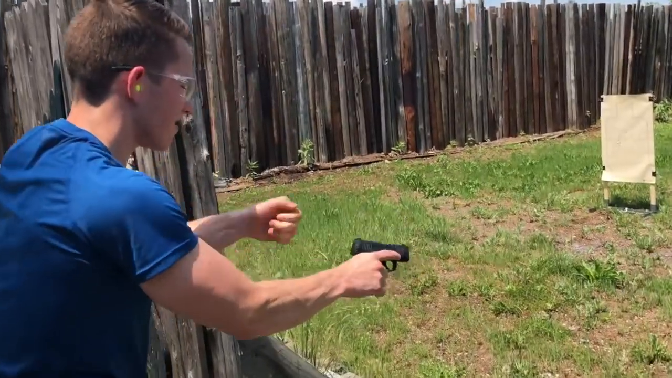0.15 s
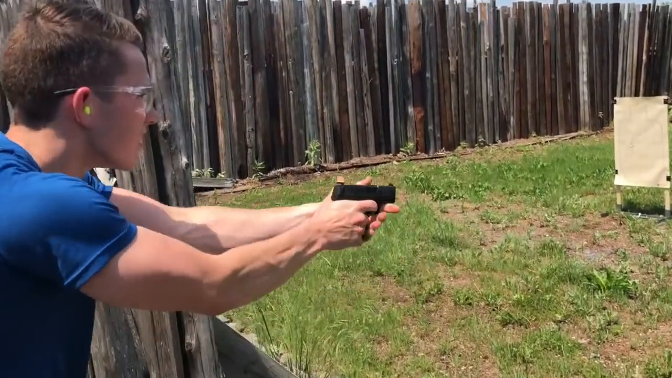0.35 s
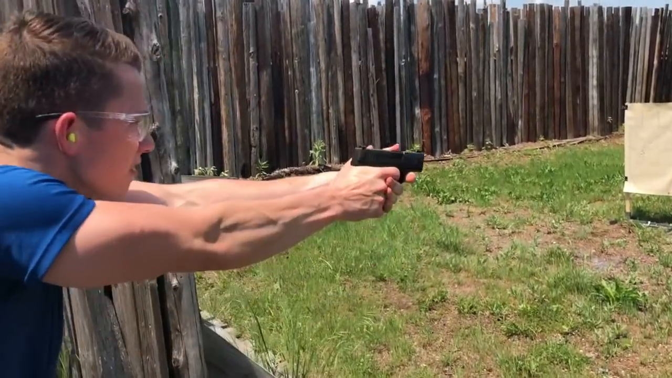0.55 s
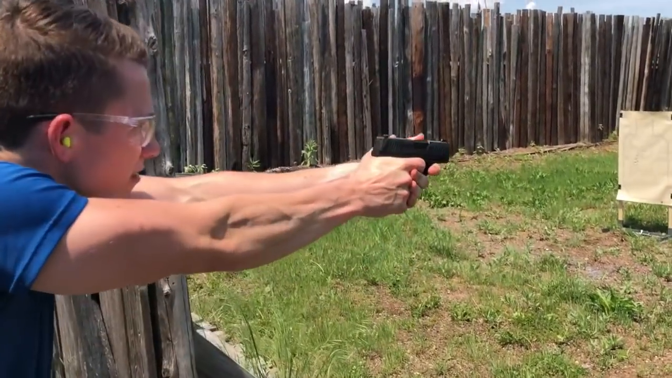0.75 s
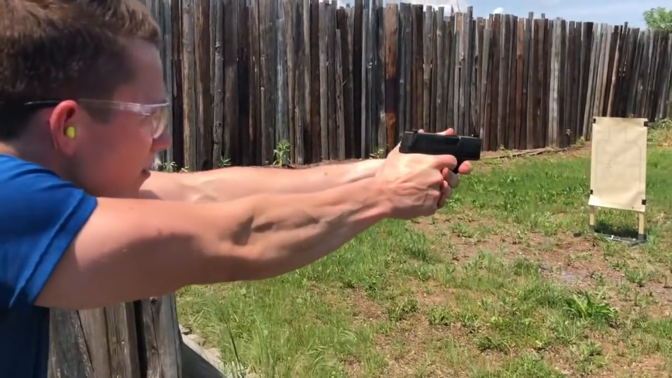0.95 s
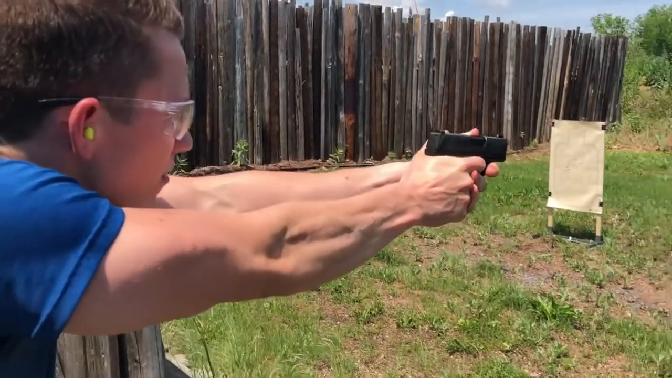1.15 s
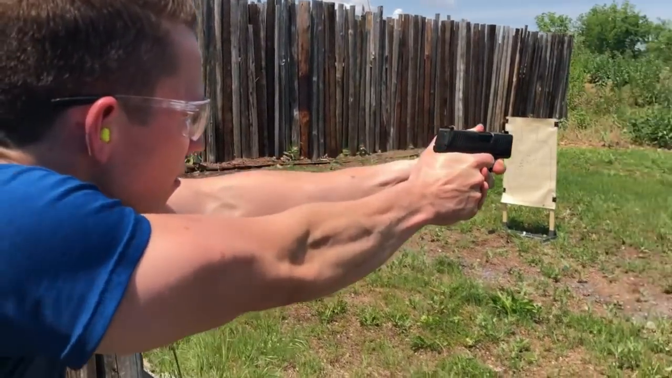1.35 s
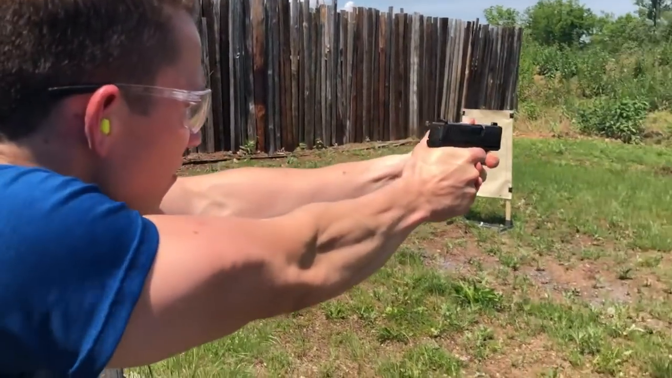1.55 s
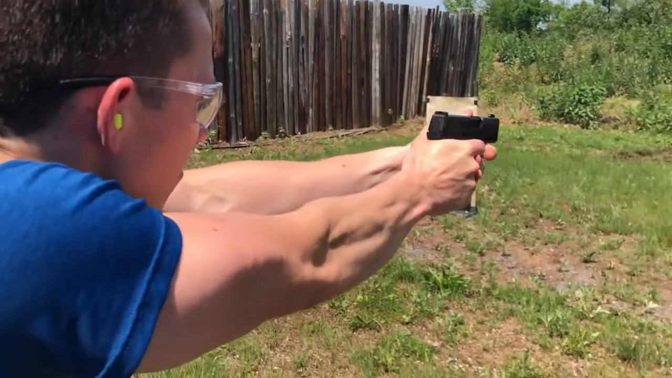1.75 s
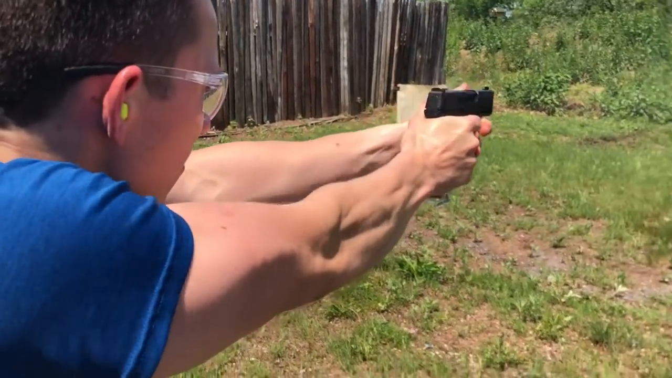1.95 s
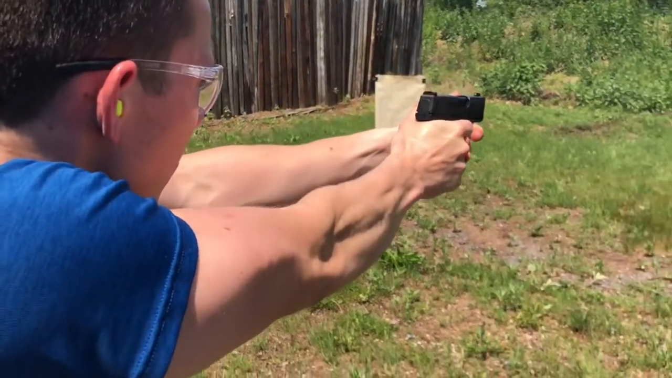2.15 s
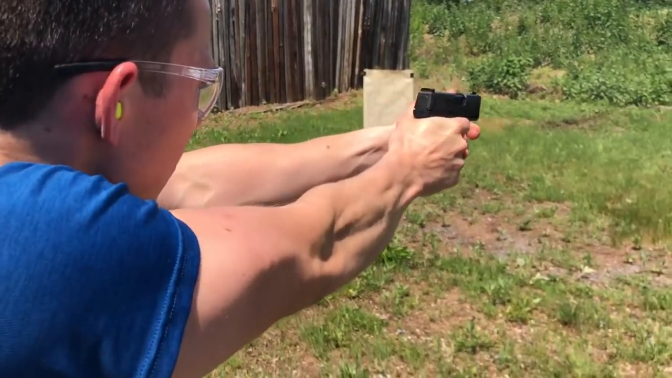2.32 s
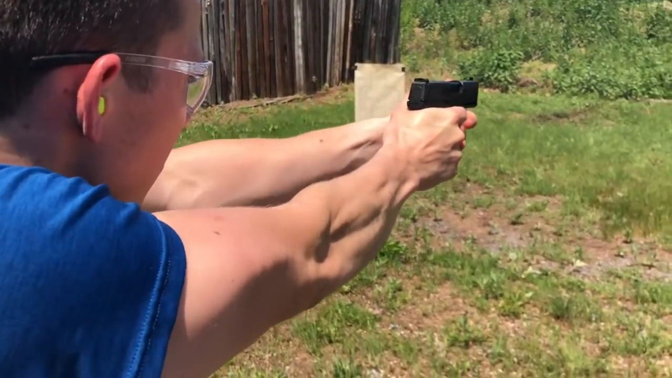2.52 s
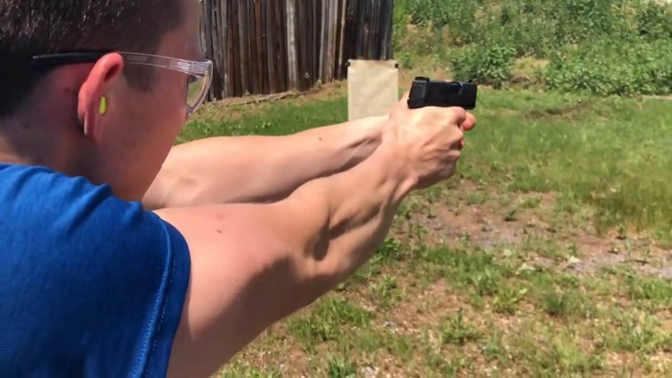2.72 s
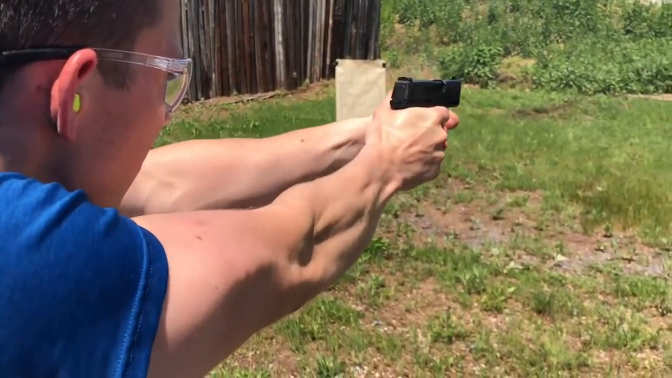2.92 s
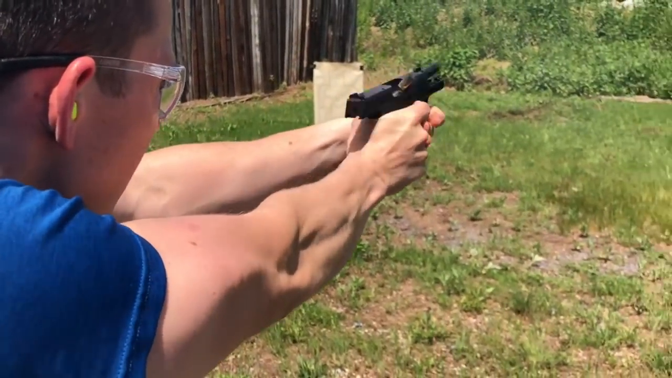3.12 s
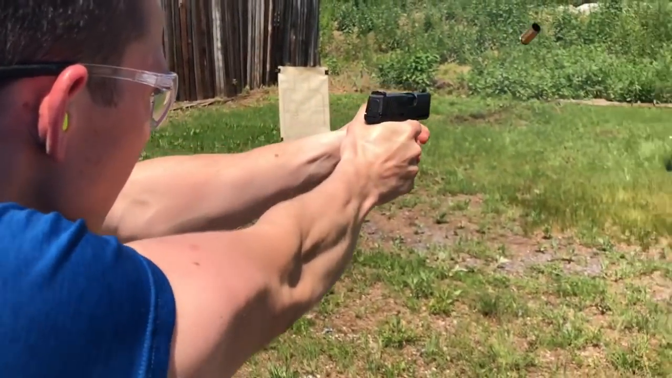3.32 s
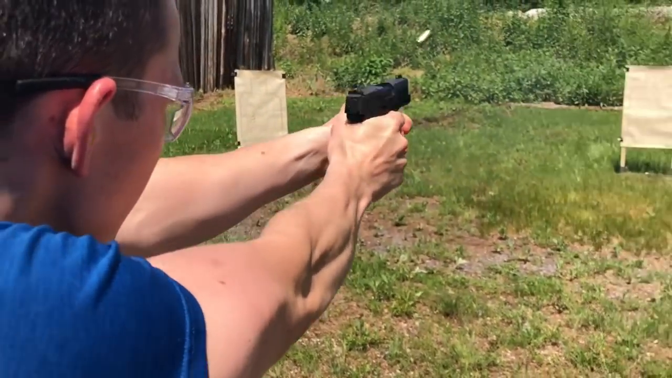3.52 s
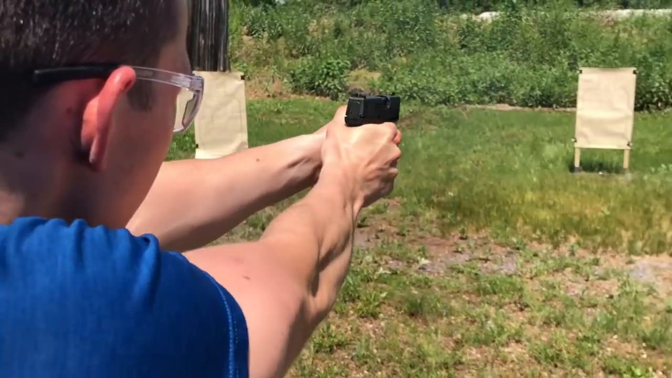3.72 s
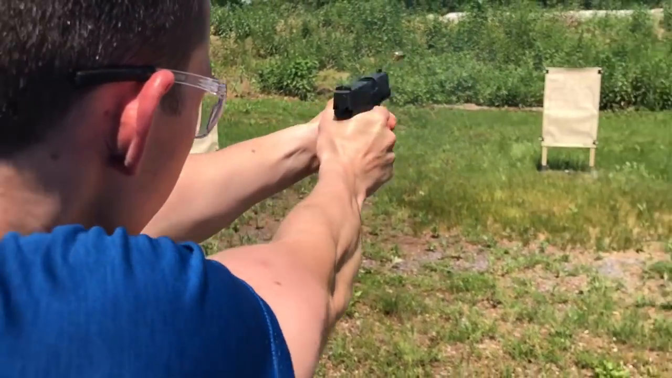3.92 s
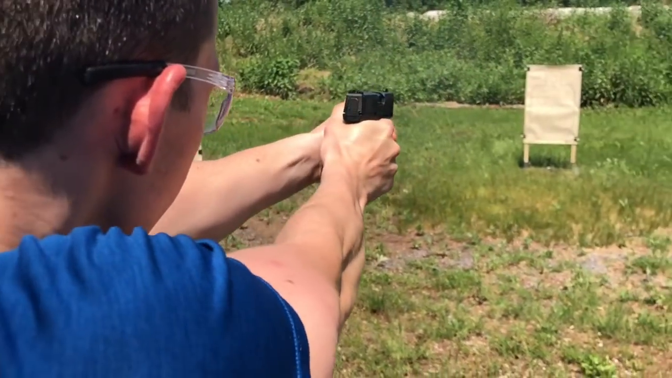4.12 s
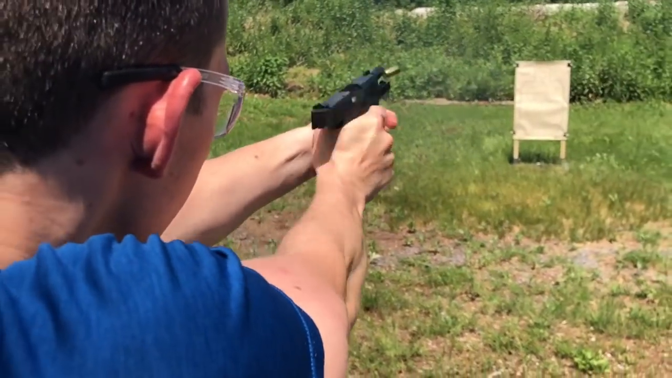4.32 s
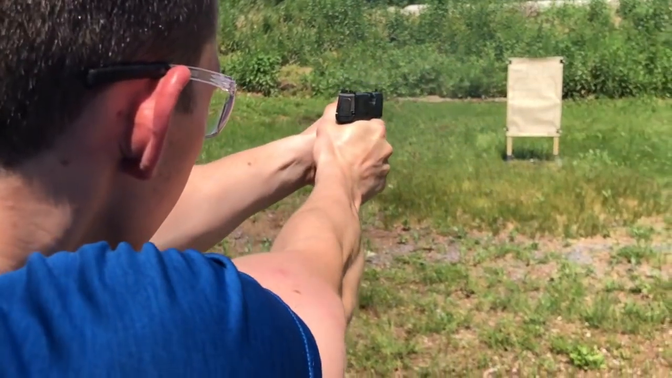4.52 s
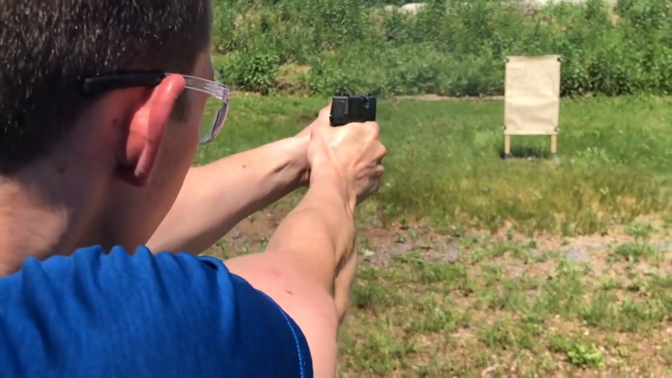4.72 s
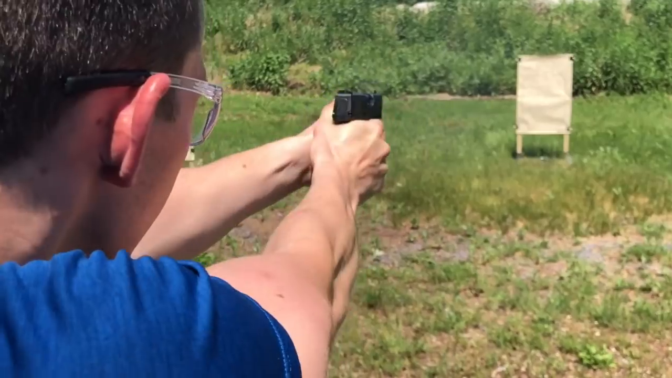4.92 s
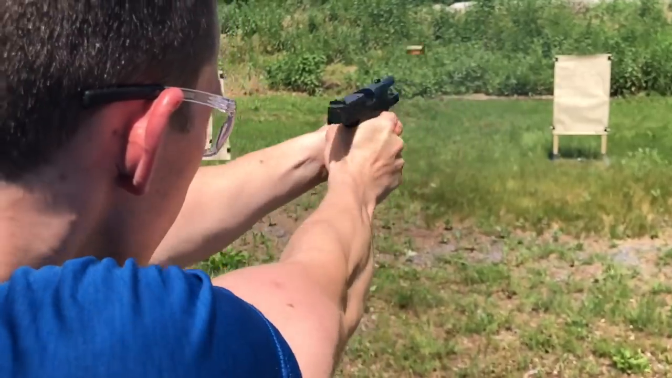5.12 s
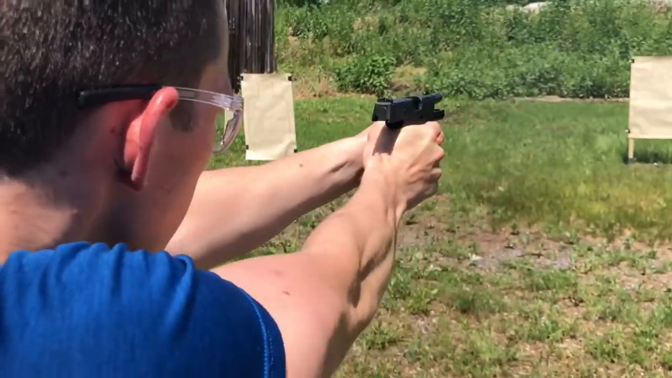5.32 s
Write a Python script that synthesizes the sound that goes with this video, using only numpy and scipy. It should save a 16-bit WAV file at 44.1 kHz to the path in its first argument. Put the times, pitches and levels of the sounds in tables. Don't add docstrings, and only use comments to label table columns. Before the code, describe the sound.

Metallic gun racking, a quiet pause with faint birds and handling, then a steady string of ten pistol shots echoing across an open range.

```python
import sys
import numpy as np
from scipy import signal
from scipy.fft import rfft, irfft
from scipy.io import wavfile
from scipy.ndimage import uniform_filter1d

SR = 44100
rng = np.random.default_rng(int(sys.argv[2]) if len(sys.argv) > 2 else 0)


def digitize_waveform(pressure):
    field = np.atleast_2d(pressure).T
    bounded = np.clip(field, -1, 1)
    quanta = np.round(bounded * 32767).astype(np.int16)
    wavfile.write(sys.argv[1], SR, quanta)


def level_to_linear(level):
    exponent = np.asarray(level, float) / 20
    return 10 ** exponent


N = 240472
ECHO_LENGTH = 32768

# [f/Hz, level/dB per Hz]
AIR_COLOUR = [(15, -36.5), (25, -14), (74, 2.5), (206, -14), (363, -12), (416, -24), (489, -12.5),
              (591, -17.5), (1790, -20), (2910, -27), (3720, -24), (14400, -48), (16000, -51.5)]
# [start t/s, end t/s, f/Hz, width f/Hz, level/dB]
INSECTS = [
    (0.55, 0.9, 1760, 70, -70),
    (0.4, .93, 2200, 200, -78),
    (0.23, 0.66, 1520, 120, -80),
    (0.62, 0.97, 3750, 260, -77),
    (0.54, 0.67, 4450, 200, -76),
    (0.58, .8, 5550, 150, -79),
    (.88, 1.02, 6100, 400, -78),
    (1.09, 1.24, 6500, 400, -78),
    (1.3, 1.43, 3400, 450, -73),
    (0.73, 1.43, 520, 21, -72.5),
]
# [start t/s, length t/s, from f/Hz, to f/Hz, peak level/dB]
BIRD_WHISTLES = [
    (0.972, .036, 3950, 3480, -64),
    (1.014, 0.095, 4500, 4900, -70),
    (1.093, 0.13, 2150, 2110, -66),
    (1.222, 0.12, 2750, 3050, -63.5),
    (1.22, .14, 4600, 5450, -74),
    (1.352, .042, 3900, 3500, -60.5),
    (1.385, 0.055, 4250, 4800, -67),
]
# [start t/s, attack t/s, length t/s, peak level/dB, end level/dB]
SLEEVE_RUBS = [
    (0.233, 0.013, 0.098, -48, -60),
    (0.932, .012, 0.17, -58.5, -72),
]
# [f/Hz, level/dB per Hz]
CLOTH_COLOUR = [(350, -33.5), (600, 2.5), (900, -7), (1400, -3), (2400, -14.5), (5000, -21), (16000, -51)]
# [t/s, peak level/dB, pitch f/Hz, crack level/dB]
GRIP_KNOCKS = [(0.411, -49.5, 1980, -2.5), (0.431, -63, 607, -13), (0.47, -53, 847, -15),
               (0.496, -53, 872, -4), (0.575, -51.5, 1054, -6), (0.627, -44.5, 1035, -24),
               (0.941, -51, 690, -19), (0.959, -49.5, 851, -17), (1.001, -40, 1310, -28),
               (1.04, -34.5, 1530, -31), (1.052, -35.5, 1520, -31), (1.076, -41, 1900, -27),
               (1.092, -50, 763, -27), (1.105, -49, 1810, -23), (1.148, -52, 2140, -19),
               (1.181, -42.5, 904, -9), (1.248, -54, 2200, -23), (1.345, -47, 1200, -23)]
# [t/s, peak
# level/dB, spring ring level/dB]
TICKS = [(1.783, -44.5, -25), (1.789, -56, -42), (2.2748, -47, -42), (2.7055, -40.5, -40),
         (3.0975, -41, -22), (3.4654, -40.5, -42), (3.8264, -43, -46), (3.9218, -59, -20),
         (4.247, -43.5, -41), (4.662, -43, -38), (4.7255, -55, -9), (5.0444, -47, -16),
         (0.468, -70, -40), (0.569, -59, -40), (0.578, -62, -40), (0.588, -62, -40)]
# [t/s, peak level/dB, brightness level/dB per octave]
SLIDE_CONTACTS = [(0.0074, -39.5, 3), (0.0153, -24.5, -1), (0.023, -23, 0.5), (0.028, -29, 1),
                  (0.0334, -39, -3.5), (0.04, -30, -7.5), (0.0507, -15, 2), (0.0568, -1.5, 0.3),
                  (0.0628, -14, 0.6), (0.069, -32.5, -1.3), (0.0824, -31, 0.3), (0.0887, -36, -4),
                  (0.0968, -19.5, 2), (0.1, -17, -0.5), (0.1052, -7, 7), (0.1044, -7.5, 0.6),
                  (0.1103, -7, -2), (0.1107, -5.5, 4.5), (0.1158, -20.5, -3), (0.1204, -25.5, 0.5)]
# [f/Hz, level/dB per Hz]
STEEL_COLOUR = [(180, -61), (300, -30.5), (1480, -5), (2650, -7.5), (4440, 2), (5250, -3.5), (10900, -4.5),
                (16000, -14)]
# [f/Hz, level/dB, time to fall 60 dB t/s]
SLIDE_MODES = [(1558, -5, 0.018), (4170, -10.5, 0.018), (6700, -4.5, .02), (10830, -8.5, .035),
               (11800, -5, .03)]
# [f/Hz, level/dB per Hz]
OPEN_AIR_COLOUR = [(200, 11), (1500, 4.5), (6000, -0.5), (16000, -1.5)]
# [t/s since slap, level/dB]
FENCE_PLANKS = [
    (.0379, 0),
    (.04, -3),
    (.042, -4),
    (.0445, -1),
]
# [t/s, slap level/dB, wall echo level/dB, tail level/dB, thump level/dB]
SHOTS = [
    (1.462, -12.5, -14.5, -27.5, -32),
    (1.986, -19.5, -18, -23.5, -28),
    (2.4229, -17, -16.5, -23.5, -29),
    (2.8233, -15, -14, -22.5, -25.5),
    (3.2065, -15.5, -13.5, -21.5, -26),
    (3.574, -15, -11.5, -21.5, -26.5),
    (3.975, -13.5, -11.5, -22.5, -25.5),
    (4.397, -12.5, -12.5, -22.5, -25),
    (4.8269, -12, -12, -22, -27.5),
    (5.1815, -11.5, -12.5, -21, -23),
]
# [f/Hz, level/dB per Hz]
LEAK_COLOUR = [(71, -54), (120, -5.5), (759, 2.5), (1620, -1.5), (2000, -13.5), (2180, -10), (2570, -20),
               (2850, -1.5), (3260, -41.5), (4200, -44), (5460, -71), (9240, -120)]
# [f/Hz, level/dB per Hz]
SLAP_COLOUR = [(88, -57), (150, -20), (406, -6.5), (637, -21.5), (979, -3), (2100, -17), (2500, -15.5),
               (6020, -17), (6770, -16.5), (7920, -17), (8900, -17), (14000, -21.5), (16000, -24)]
# [f/Hz, level/dB per Hz]
WALL_COLOUR = [(88, -44.5), (150, -16.5), (941, 6), (1660, -7), (4670, -10), (5790, -15), (6390, -13),
               (7180, -15), (12700, -24), (16000, -28)]
# [f/Hz, level/dB per Hz]
TAIL_COLOUR = [(59, -68), (100, -25), (129, -26), (381, -22.5), (502, -5), (1060, 1.5), (1720, -12),
               (2170, -9), (2930, -17), (3320, -13.5), (4110, -17.5), (7940, -21.5), (14700, -30),
               (16000, -39)]
# [f/Hz, time to fall 60 dB t/s]
TAIL_T60 = [(100, 0.55), (250, 0.57), (600, 0.41), (1200, 0.56), (2500, 0.46), (5000, 0.45), (9000, 0.35),
            (16000, 0.27)]


def rms_one(x):
    return x / np.sqrt(np.mean(x ** 2, axis=-1, keepdims=True) + 1e-20)


def at_hz(points, hz):
    table = np.array(points)
    return np.interp(np.log(hz + 1), np.log(table[:, 0]), table[:, 1])


def coloured(white, spectrum, tilt_db=0):
    hz = np.fft.rfftfreq(white.shape[-1], 1 / SR)
    tilt = tilt_db * np.log2(np.maximum(hz, 1000) / 1000)
    return rms_one(irfft(rfft(white) * level_to_linear(at_hz(spectrum, hz) + tilt), white.shape[-1]))


def dying(t, t60):
    return (t >= 0) * level_to_linear(-60 * np.maximum(t, 0) / np.maximum(t60, .001))


def ring(clicks, hz, t60):
    r = level_to_linear(-60 / (max(t60, .001) * SR))
    w = 2 * np.pi * hz / SR
    return signal.lfilter([0, np.sin(w)], [1, -2 * r * np.cos(w), r * r], clicks + 1e-18)


def high_pass(x, hz):
    return signal.sosfilt(signal.butter(3, hz, "high", fs=SR, output="sos"), x)


def band_pass(x, order, low_hz, high_hz):
    return signal.sosfilt(signal.butter(order, [low_hz, high_hz], "band", fs=SR, output="sos"), x)


def disperse(x, hz, count):
    pole = np.exp(-2 * np.pi * hz / SR)
    for stage in range(count):
        x = signal.lfilter([-pole, 1], [1, -pole], x)
    return x


def add(track, s, sound):
    i = round(s * SR)
    track[i:i + len(sound)] += sound[:N - i]


def air():
    lumps = rms_one(uniform_filter1d(rng.standard_normal(N), size=2500))
    t = np.arange(N) / SR
    duck_s, duck_db, creep_db_per_s = 1.441, -38, 1.5
    lull_s, lull_db = 0.49, -3.5
    ducked = np.clip((t - duck_s) / .03, 0, 1) * (duck_db + creep_db_per_s * (t - duck_s))
    gain_db = -60 + lull_db * np.clip(t / lull_s, 0, 1) + ducked + 1.2 * lumps
    return level_to_linear(gain_db) * coloured(rng.standard_normal(N), AIR_COLOUR)


def insects():
    out = np.zeros(N)
    for start, end, hz, width_hz, db in INSECTS:
        white = rng.standard_normal(22050)[:round((end - start) * SR)]
        buzz = rms_one(ring(white, hz, 2.2 / width_hz))
        add(out, start, level_to_linear(db) * buzz * signal.windows.tukey(len(buzz), .3))
    return out


def bird():
    out = np.zeros(N)
    for start, length, from_hz, to_hz, db in BIRD_WHISTLES:
        white = rng.standard_normal(8192)[:round(length * SR)]
        blur = .6 + .8 * rms_one(uniform_filter1d(white, size=110))
        glide_hz = np.linspace(from_hz, to_hz, len(white))
        tone = np.sin(2 * np.pi * np.cumsum(glide_hz) / SR)
        add(out, start, level_to_linear(db) * blur * tone * np.hanning(len(white)) ** 0.58)
    return out


def sleeve():
    white = rng.standard_normal(N)
    slips = white * level_to_linear(1.7 * rms_one(uniform_filter1d(rng.standard_normal(N), size=150)))
    t = np.arange(N) / SR
    rubs_db = [np.interp(t - s, [0, attack, length], [db - 23, db, end_db], left=-120, right=-120)
               for s, attack, length, db, end_db in SLEEVE_RUBS]
    return coloured(slips, CLOTH_COLOUR) * level_to_linear(rubs_db).sum(axis=0)


def knocks():
    out, t = np.zeros(N), np.arange(2048) / SR
    noises = rng.standard_normal((len(GRIP_KNOCKS), len(t)))
    for (s, db, hz, crack_db), noise in zip(GRIP_KNOCKS, noises):
        tap = (t == 0) * 2.1 + noise * dying(t, 0.022) * 0.63
        hollow = ring(tap, hz, 10.0 / hz) + 0.63 * ring(tap, 0.93 * hz, 2.8 / hz)
        body = high_pass(hollow, 770)
        crack = band_pass(tap, 3, 1900, 7000)
        add(out, s, level_to_linear(db) * (body / np.abs(body).max() + level_to_linear(crack_db + 6.5) * crack))
    return out


def trigger():
    out, t = np.zeros(N), np.arange(6144) / SR
    spring_hz, spring_t60_s = 11050, 0.18
    spring = np.sin(2 * np.pi * spring_hz * t) * dying(t, spring_t60_s)
    thin = signal.butter(2, 2500, "high", fs=SR, output="sos")
    noises = rng.standard_normal((len(TICKS), len(t)))
    for (s, db, ring_db), noise in zip(TICKS, noises):
        tick = signal.sosfilt(thin, noise * (dying(t, 0.0097) + 0.14 * dying(t, .05)))
        add(out, s, level_to_linear(db) * (tick + level_to_linear(ring_db) * spring))
    return out


def wall_echo(t):
    return sum(level_to_linear(db) * dying(t - s, 0.017) for s, db in FENCE_PLANKS)


def swell_db(t):
    shadow_db, start_s, rise_s = -12.5, .052, .011
    corner_db, corner_s, corner_width_s = 3, 0.0934, 0.0072
    trees_db, trees_s, trees_power = 8.5, 0.41, 2.84
    shadow = shadow_db * np.clip(1 - (t - start_s) / rise_s, 0, 1)
    corner = corner_db * np.exp(-((t - corner_s) / corner_width_s) ** 2)
    trees = trees_db * (np.clip(t, 0, .6) / trees_s) ** trees_power
    return shadow + corner + trees


def tail(white, t, colour, tilt_db):
    spectrum = rfft(coloured(white, colour, tilt_db))
    hz = np.fft.rfftfreq(ECHO_LENGTH, 1 / SR)
    centres = np.geomspace(100, 16000, num=16)
    fading = 0
    for centre, row in zip(centres, np.eye(len(centres))):
        band = irfft(spectrum * np.interp(np.log(hz + 1), np.log(centres), row))
        fading = fading + band * level_to_linear(-60 * (t - .08) / at_hz(TAIL_T60, centre))
    return fading * (t >= 0) * level_to_linear(swell_db(t))


def slide():
    t = np.arange(8192) / SR
    white = rng.standard_normal(len(t))
    cracks = np.zeros(len(t))
    for s, db, tilt_db in SLIDE_CONTACTS:
        hits = dying(t - s - .0008, .016) + 0.23 * dying(t - s + 0.00064, 0.014)
        cracks += level_to_linear(db - 10.5) * hits * coloured(white, STEEL_COLOUR, tilt_db)
    modes = level_to_linear(-35.5) * sum(level_to_linear(db) * ring(cracks, hz, t60) for hz, db, t60 in SLIDE_MODES)

    t = np.arange(ECHO_LENGTH) / SR
    white = coloured(rng.standard_normal((len(SLIDE_CONTACTS), ECHO_LENGTH)), STEEL_COLOUR)
    echoes = level_to_linear(-42) * white * wall_echo(t - .008) + level_to_linear(-48) * tail(white, t, OPEN_AIR_COLOUR, 0)
    steel = np.zeros(N)
    add(steel, 0, cracks + modes)
    for (s, db, tilt_db), echo in zip(SLIDE_CONTACTS, echoes):
        add(steel, s, level_to_linear(db) * echo)
    return high_pass(steel, 800)


def swing(s):
    centre_s, width_s = 4.32, 0.63
    return np.exp(-((np.asarray(s) - centre_s) / width_s) ** 2)


def berm():
    clicks, s = np.zeros(N), np.transpose(SHOTS)[0]
    first_s, gap_s, sideways_share = .1848, .006, .45
    for lag, db in ((first_s, -15), (first_s + gap_s, -17)):
        strength = np.maximum(swing(s) ** .5, sideways_share)
        clicks[np.round((s + lag) * SR).astype(int)] = level_to_linear(db) * strength
    return high_pass(ring(clicks, 1030, 0.0058) + 0.23 * ring(clicks, 1310, 0.017), 580)


def by_shot(first, later):
    return np.where(np.arange(len(SHOTS)) == 0, first, later)[:, None]


def scatter(likeness):
    rows = rng.standard_normal((len(SHOTS), ECHO_LENGTH))
    for k in range(1, len(rows)):
        rows[k] = likeness * rows[k - 1] + np.sqrt(1 - likeness ** 2) * rows[k]
    return rows


def thump(t, white, low_db, chest_db):
    x = level_to_linear(-27.5) * white * (dying(t, 0.019) + dying(t - .038, 0.084) + 0.017 * dying(t, .9))
    pushes = np.searchsorted(t, [.001, .012, .0385, .052])
    push_db = [-6, -7, 0, -24.5] + 1.5 * rng.standard_normal((len(SHOTS), 4))
    x[:, pushes] = level_to_linear(push_db) * np.sign([1, 1, -1, -1])
    x = disperse(x, 244.0, count=15)
    low = band_pass(x, 2, 45, 110)
    chest = band_pass(x, 2, 100, 300)
    return (level_to_linear(low_db) * low + level_to_linear(chest_db) * chest) * level_to_linear(48.0)


def shots():
    lead_s = .0235
    t = np.arange(ECHO_LENGTH) / SR - lead_s
    white = scatter(likeness=0.83)
    shot_s, slap_db, wall_db, tail_db, thump_db = np.transpose(SHOTS)[:, :, None]
    aim = swing(shot_s)
    leak_start_db, leak_end_db = by_shot(-31, -58.5), by_shot(-11.5, -27)
    hiss_db, chest_db = by_shot(-35, -58.5), by_shot(-31.5, -32)
    tilt_db = by_shot(0, -0.38)

    slap_fall = 0.93 * dying(t, 0.073) + 0.32 * dying(t - .004, 0.013) + 0.25 * dying(t - .009, 0.0063)
    slap = coloured(white, SLAP_COLOUR, tilt_db) * slap_fall
    wall = coloured(white, WALL_COLOUR, tilt_db) * wall_echo(t)

    rise = np.clip((1 + t / lead_s) * 0.96, 0, 1)
    leak_db = leak_start_db + (leak_end_db + 4.5 * aim - leak_start_db) * rise
    leak = coloured(white[:, ::-1], LEAK_COLOUR) * level_to_linear(leak_db) * np.where(t < 0, 1, dying(t, 0.1))
    hiss = coloured(white, SLAP_COLOUR, 1.8) * level_to_linear(hiss_db) * (t < -.003) * level_to_linear(-3 * rise)

    posts = level_to_linear(1.62 * rms_one(uniform_filter1d(scatter(likeness=0.65), size=130)))
    sharp = disperse(high_pass(level_to_linear(slap_db) * slap + level_to_linear(wall_db) * wall + hiss, 330), 500, count=5)
    held_db = 4.5 * aim * (t + 0.12)
    scattered = tail(np.roll(white, 9000, axis=1) * posts, t, TAIL_COLOUR, tilt_db)
    rolling = high_pass(level_to_linear(tail_db + held_db) * scattered, 127)
    rows = sharp + rolling + leak + thump(t, white, thump_db, chest_db)
    out = np.zeros(N)
    for (s, *_), row in zip(SHOTS, rows):
        add(out, s - lead_s, row)
    return out


def scene():
    out = shots() + berm() + knocks() + sleeve() + trigger() + bird() + insects() + air()
    add(out, 0, slide())
    return out[None]


def roll_off(x):
    return signal.sosfilt(signal.butter(12, 17000, fs=SR, output="sos"), x)


def record(dry):
    clamp_s, recover_s, hold_s, settle_s = 1.479, .14, 0.065, 0.35
    clamp_db, overshoot_db = -8, 8
    turns_s = np.cumsum([clamp_s, recover_s, hold_s, settle_s])
    gain_db = np.interp(np.arange(N) / SR, turns_s, [clamp_db, overshoot_db, overshoot_db, 0], left=0)
    level = dry * level_to_linear(gain_db)
    rounded = level / (1 + (level / .54) ** 4) ** .25
    cutoff_hz = 15900
    top_cut = signal.cheby2(10, 45, cutoff_hz * 1.044, fs=SR, output="sos")
    mix = signal.sosfilt(top_cut, rounded)
    return roll_off(mix)


dry = scene()
out = record(dry)
digitize_waveform(out)
```